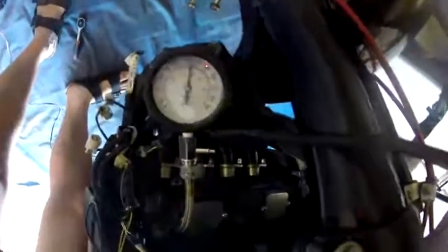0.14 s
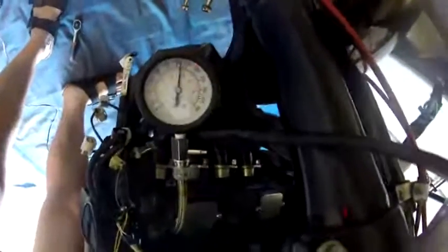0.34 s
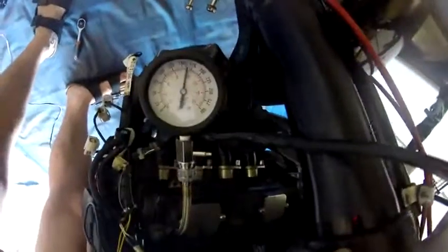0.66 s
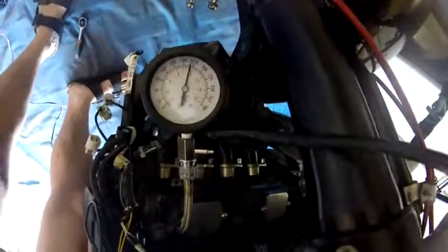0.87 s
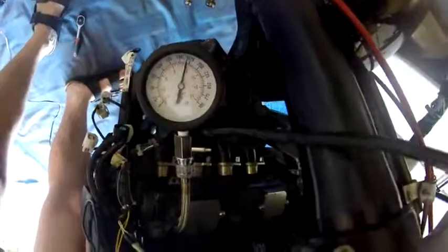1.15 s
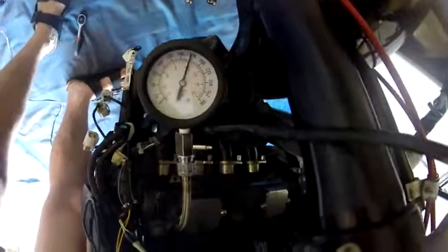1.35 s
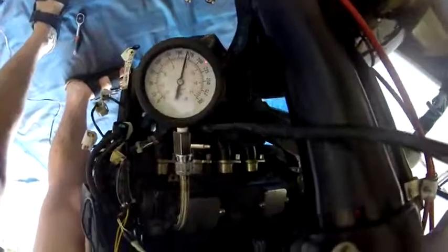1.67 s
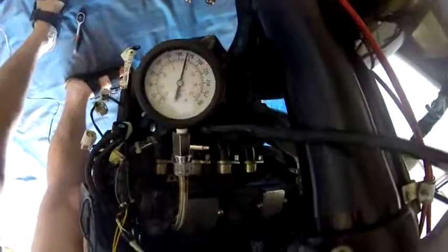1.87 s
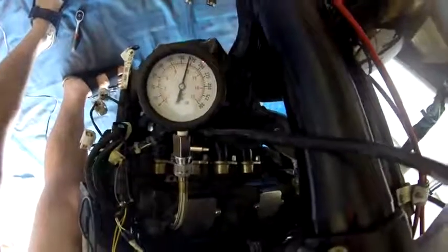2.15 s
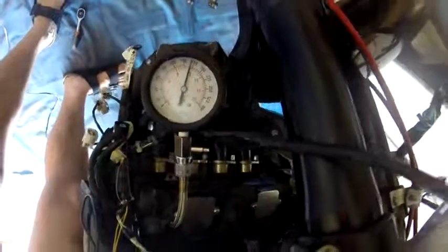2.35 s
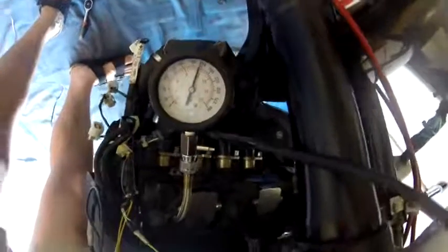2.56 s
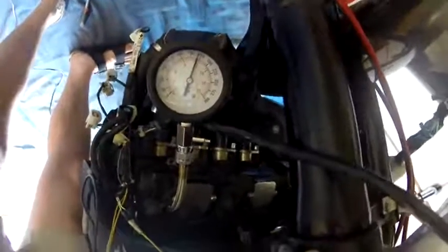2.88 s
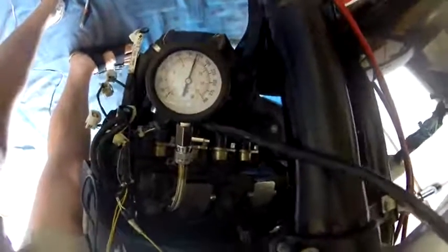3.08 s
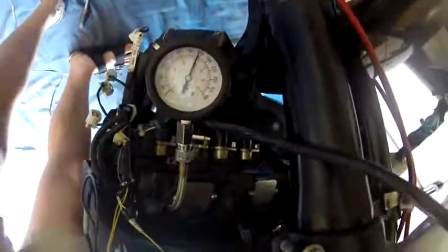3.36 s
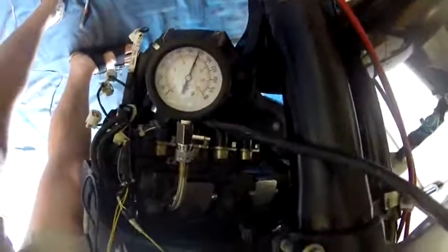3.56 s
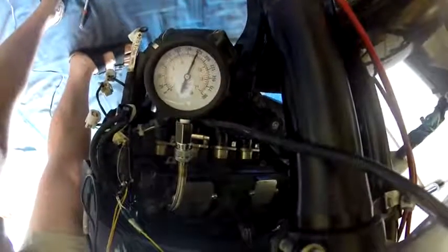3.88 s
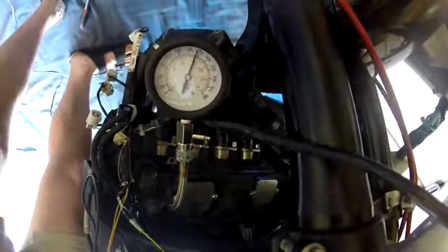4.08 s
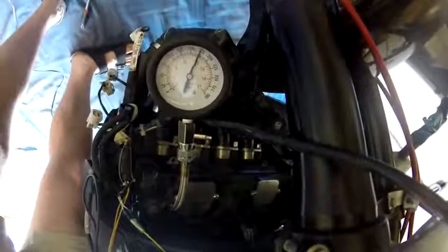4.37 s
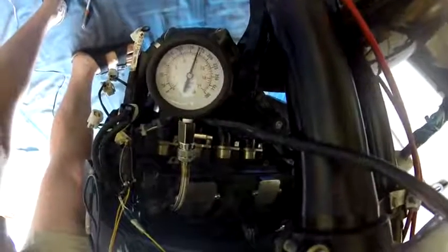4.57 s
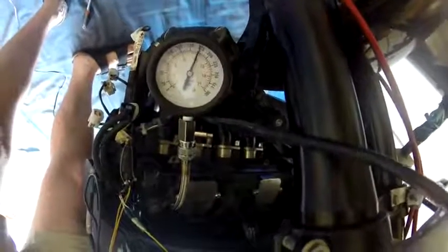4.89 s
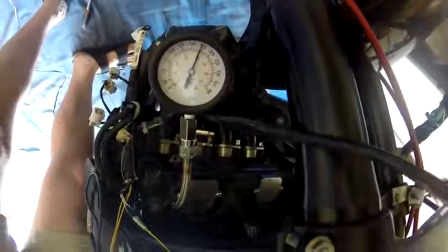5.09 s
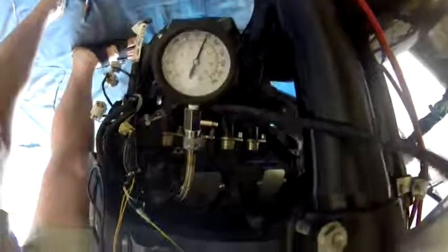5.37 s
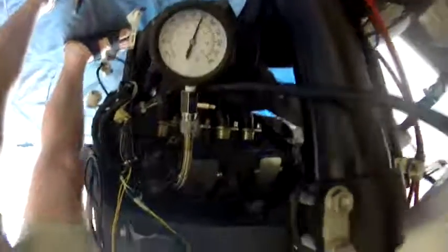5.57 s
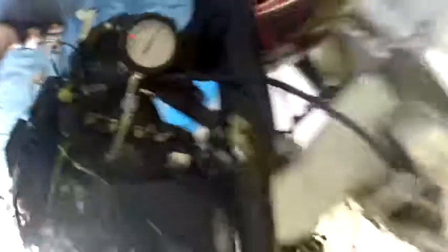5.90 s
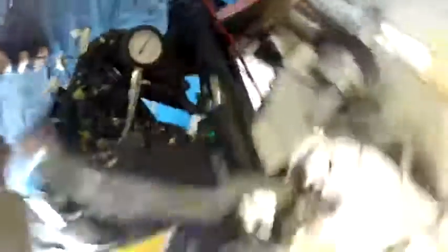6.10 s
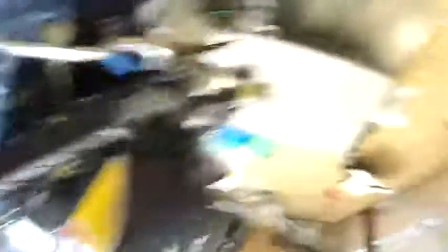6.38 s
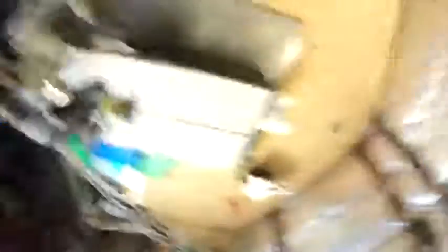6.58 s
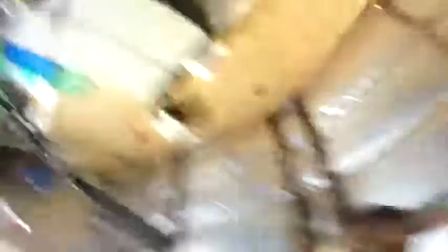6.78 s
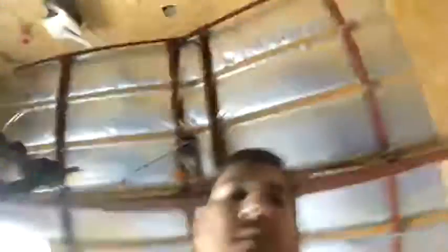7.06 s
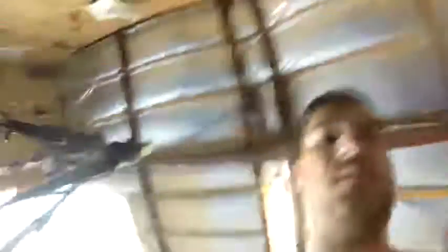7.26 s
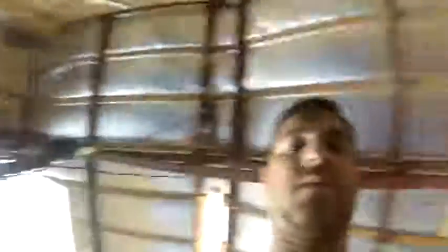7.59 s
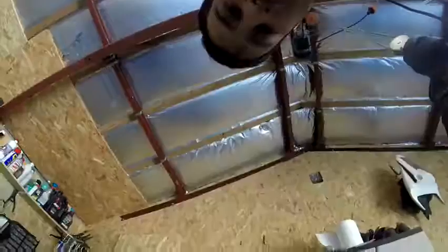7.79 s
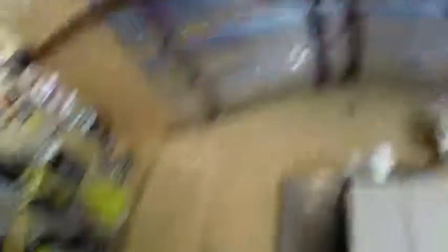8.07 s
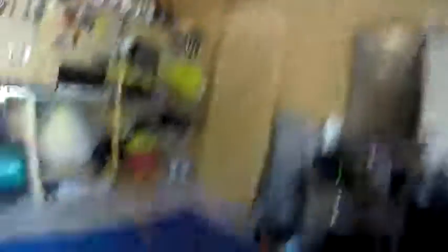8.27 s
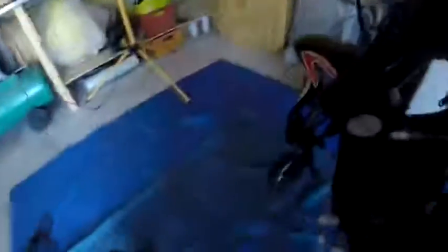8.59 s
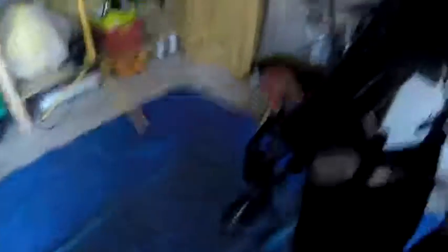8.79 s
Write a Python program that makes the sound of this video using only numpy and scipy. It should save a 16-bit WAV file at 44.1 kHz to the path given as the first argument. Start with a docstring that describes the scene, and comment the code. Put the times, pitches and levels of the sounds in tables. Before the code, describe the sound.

An electric starter cranks a motorcycle engine in clattering, whining pulses, runs down to a clack, then soft handling knocks and rustles follow.

```python
"""In a workshop, close by, an electric starter cranks a motorcycle engine with one cylinder compressing.
Three times a cycle the gears take load: impacts ring the cases (clatter) and meshing teeth give a whine.
Compression slows the drive and lowers the whine, then pressure pulses thump out of the open ports.
The starter runs down to a last clack; a hand-held object is carried about with knocks, ticks and rustles."""
import sys
import numpy as np
from scipy import signal
from scipy.fft import rfft, irfft
from scipy.io import wavfile

SR = 44100
rng = np.random.default_rng(int(sys.argv[2]) if len(sys.argv) > 2 else 0)


def to_wav(s):
    """Save 16-bit WAV."""
    ch = np.atleast_2d(s).T  # columns
    pcm = np.round(np.clip(ch, -1, 1) * 32767)  # PCM
    wavfile.write(sys.argv[1], SR, pcm.astype(np.int16))


N = 394254
TIME_S = np.arange(N) / SR

# Three gear loadings, then the push over compression: after_top_s, hold_s, clatter_db, whine_db, blow_db
GEAR_LOADS = [(0.024, 0.027, -22.5, -16.5, 3.5), (0.08, 0.04, -21, -16, 3.5),
              (.149, 0.031, -20.5, -15, 2.5), (.193, 0.02, -20.5, -12.5, 0.5)]
# Unpowered slowing of the crank: time_s, cycle_place_s, tooth_hz, clatter_change_db, whine_change_db
RUN_DOWN = [(4.6713, 0.0049, 1503, 0.38, 0.2), (4.7, 0.024, 1489, 2, -1.5), (4.716, .042, 1450, 0, -9),
            (4.765, 0.085, 1310, -3.6, -0.5), (4.81, .12, 1148, -3, -1), (4.848, 0.15, 931, -6, -8),
            (4.91, 0.16, 770.4, -6, -1), (4.965, .178, 708, -11.5, -2), (5.03, 0.19, 660, -28, -48),
            (5.12, 0.18, 600, -59.5, -80)]
# Broadband radiation of the clatter: frequency_hz, level_db
CLATTER_SPECTRUM = [(90, -34.5), (150, -16.5), (450, -18), (640, -11), (800, 1.5), (1200, -2), (2000, -2),
                    (3100, -2), (3600, -5.5), (5000, -4), (8300, -8.5), (9000, -9.5), (9600, -29.5),
                    (13000, -24), (14000, -33.5)]
# Resonances of the engine cases: pitch_hz, width_hz, gain_db
CASE_MODES = [(512, 35, -9), (589, 22, -7), (700, 40, -6), (770, 110, -3), (1275, 35, -4), (1530, 35, -1),
              (2135, 35, -1), (2535, 60, -3), (2665, 40, -5), (2770, 50, -5), (2970, 50, -6),
              (3790, 35, -9), (4202, 55, -4), (4348, 35, -6), (5300, 66, -8), (5990, 150, -7),
              (6210, 90, -7), (6575, 90, -6), (7158, 70, -5), (7910, 150, -7), (8270, 70, -7)]
# Harmonics of the tooth rate: harmonic_number, level_db
MESH_HARMONICS = [(1, -5), (2, -7.5), (3, -8), (4, -28), (5, -13.5)]
# How well the cases radiate a tone: frequency_hz, gain_db
CASE_RADIATION = [(600, -11), (760, -4), (1000, -3), (1500, 2.5), (1650, 1), (2000, -0.5), (2500, 8.5),
                  (2800, 1), (3050, -8.5), (3230, -1), (3700, -4), (4250, -0.5), (4600, .5), (4800, -11.5),
                  (6000, -5.5), (8000, -4.5)]
# Pressure pulses in the open ports: after_top_s, gain_db
PORT_PULSES = [(-.001, 0.5), (0.0154, 0.5), (.033, -6), (.044, -4.5), (.057, -14.5), (0.073, -10.5),
               (.099, -17.5), (.166, -14)]
# Vibration of the frame: frequency_hz, level_db
SHAKE_SPECTRUM = [(15, -21), (30, -14.5), (65, -5.5), (120, .5), (200, -7), (350, -4), (600, -20),
                  (1200, -46)]
# Reverberation of the workshop: frequency_hz, t60_s
ROOM_DECAY = [(300, .3), (800, .3), (2100, .27), (5500, .2), (12000, .13)]
# Background noise of the workshop: frequency_hz, level_db
HUSH_SPECTRUM = [(12, -32.5), (20, 0.5), (184, -6.5), (293, -9.5), (481, -9.5), (2630, -21), (3460, -23),
                 (14000, -43)]
# Rumble of hands on the object: time_s, level_db
RUMBLE_LEVELS = [(5.2, -54), (5.42, -72), (5.65, -61.5), (6.54, -57.5), (7.42, -55.5), (7.76, -72.5),
                 (7.9, -49), (8.08, -48), (8.16, -55), (8.63, -56.5), (8.94, -51.5)]
# Colour of that rumble: frequency_hz, level_db
RUMBLE_SPECTRUM = [(12, -18.5), (25, -1.5), (60, -7), (120, -9), (300, -16), (800, -28.5), (2000, -47)]
# Ticks and short scratches: start_s, peak_db, centre_hz, width_ratio, t60_s
LIGHT_CONTACTS = [(5.485, -48, 3500, .06, 0.05), (5.903, -43, 2300, 1.2, 0.0094),
                  (6.284, -39, 450, 1.7, 0.025), (6.523, -47, 4970, 1.2, .008),
                  (6.744, -40.5, 5500, 1.1, 0.0075), (6.959, -28.5, 2500, 2.1, 0.011),
                  (7.009, -45, 2500, 2.5, .006), (7.044, -40, 2500, 0.73, 0.0052),
                  (7.072, -40, 1200, 1.3, 0.0069), (7.084, -35.5, 700, 1.7, 0.041),
                  (7.088, -35, 2080, 0.3, .035), (7.101, -40, 1190, 1.1, 0.0066),
                  (7.291, -43, 900, 0.99, .01), (7.354, -44, 900, 2.5, .006),
                  (7.478, -39, 1200, 2.6, 0.0066), (7.93, -41, 450, 2, .03),
                  (7.963, -42.5, 4000, 1.8, 0.0061), (8.123, -45.5, 4170, .4, .03),
                  (8.122, -36.5, 497, 0.91, 0.04), (8.785, -38, 3000, 2, 0.018),
                  (8.804, -40, 3010, 2.2, .012)]
# Strokes of rubbing cloth and tarp: start_s, hold_s, level_db
RUB_STROKES = [(6.05, .02, -64), (6.297, 0.012, -60), (6.597, .02, -62.5), (6.747, .005, -59),
               (6.95, 0.12, -60), (7.08, 0.026, -56.5), (7.236, 0.025, -54), (7.3, .08, -60),
               (7.392, 0.014, -48), (7.93, 0.12, -62.5), (8.125, .01, -59), (8.233, .005, -59),
               (8.36, .02, -60), (8.534, .05, -59), (8.598, .02, -52.5), (8.635, .01, -46),
               (8.739, 0.0083, -54), (8.854, 0.068, -37), (8.922, .03, -34)]
# Friction noise of the cloth: frequency_hz, level_db
RUB_SPECTRUM = [(120, -45), (200, -14.5), (290, -4), (1270, -6), (2280, 2), (3890, -0.5), (6400, -4.5),
                (10500, -12), (14000, -23.5)]
# Dull knocks on the object: start_s, peak_db, pitch_hz, damping_per_period, first_swing_sign
BODY_KNOCKS = [(6.284, -33.5, 109.6, 3.7, -1), (6.52, -28.5, 55.4, 2, 1), (6.745, -33.5, 55.2, 1.4, -1),
               (6.959, -35, 302, 2, 1), (7.009, -35, 200, 9.7, 1), (7.066, -40, 45.3, 1.1, -1),
               (7.93, -25.5, 111, 6.2, -1), (8.015, -44, 40.3, 2.5, -1), (8.123, -46, 250, 1, -1),
               (8.785, -36, 180, 2.2, 1), (8.803, -38, 178, 1.5, 1)]

FIRST_TOP_S, CYCLE_S, TIRING_S, CYCLES = -.0675, .26391, 7.6e-5, 19
SKIP_AT_S, SKIP_S = 2.068, .0232  # the rhythm jumps ahead once


def gain_of(db):
    """Amplitude ratio of a level in decibels."""
    return 10 ** (np.asarray(db) / 20)


def unit_rms(x):
    """Normalisation to unit mean power."""
    return x / np.sqrt(np.mean(abs(x) ** 2) + 1e-20)


def at_frequency(points, hz):
    """Interpolation of a curve over log frequency."""
    known_hz, value = np.transpose(points)
    return np.interp(np.log(hz + 1), np.log(known_hz + 1), value)


def follow(rows):
    """Linear interpolation of each column over time."""
    time_s, *columns = np.transpose(rows)
    return [np.interp(TIME_S, time_s, column) for column in columns]


def add(mix, start_s, sound):
    """Superposition of a sound on the mix."""
    part = mix[round(start_s * SR):][:len(sound)]
    part += sound[:len(part)]


def coloured(x, spectrum):
    """Filtering by multiplication of spectra."""
    return irfft(rfft(x) * gain_of(at_frequency(spectrum, np.fft.rfftfreq(len(x), 1 / SR))), len(x))


def wander(hz):
    """Random modulation: low-passed noise of rms 1."""
    return unit_rms(signal.sosfilt(signal.butter(2, hz, fs=SR, output="sos"), rng.standard_normal(N)))


def ring(x, hz, width_hz):
    """A second-order resonance of peak gain 1."""
    return signal.lfilter(*signal.iirpeak(hz, hz / width_hz, SR), x)


def strokes(t, rows, rest_db, rise_db_per_s, ease_s, sag_db_per_s=0):
    """Envelope in dB: a linear rise, a sagging hold, then exponential relaxation to rest."""
    level = np.full(len(t), float(rest_db))
    for start_s, hold_s, db in rows:
        held = db - sag_db_per_s * np.clip(t - start_s, 0, hold_s)
        held -= rise_db_per_s * np.maximum(start_s - t, 0)
        release = np.exp(-np.maximum(t - start_s - hold_s, 0) / ease_s)
        level = np.maximum(level, rest_db + (held - rest_db) * release)
    return level


def top_times():
    """Tops of the compression stroke: each period is TIRING_S longer than the last."""
    k = np.arange(CYCLES)
    return FIRST_TOP_S + CYCLE_S * k + TIRING_S * k * (k - 1) / 2


def tooth_rate(place_s, base_hz=1602, overrun_hz=42, sag_hz=245, sag_from_s=.178, sag_s=.04):
    """Mesh frequency follows shaft speed: the pinion races as it meets load; compression drags it."""
    since_s = (place_s - sag_from_s) % CYCLE_S
    recovery = np.maximum(1 - (since_s - sag_s) / .069, 0)
    drag = np.where(since_s < sag_s, np.sin(np.pi / 2 * since_s / sag_s) ** 2, recovery)
    race = sum(np.exp(-abs(place_s - load[0]) / .008) for load in GEAR_LOADS[:-1])
    return base_hz + overrun_hz * race - sag_hz * drag


def crank(bounce_s=.02, blow_s=.0045):
    """Cyclic loading sets clatter level, tooth rate and whine level; teeth part and strike again."""
    cycles = np.interp(TIME_S + SKIP_S * (TIME_S > SKIP_AT_S), top_times(), np.arange(CYCLES))
    slow_place_s, slow_hz, clatter_db, whine_db = follow(RUN_DOWN)
    powered = cycles < CYCLES - 1
    place_s = np.where(powered, cycles % 1 * CYCLE_S, slow_place_s)
    strength = rng.random((CYCLES, len(GEAR_LOADS), 2))[cycles.astype(int)]
    blows_db = np.zeros(N)
    for k, (after_s, *_, db) in enumerate(GEAR_LOADS):
        for bounce in range(2):
            contact = np.exp(-((place_s - after_s - bounce * bounce_s) / blow_s) ** 2)
            blows_db += db * strength[:, k, bounce] * contact
    push = GEAR_LOADS[-1]  # fades on into the next cycle
    loads = np.array([*GEAR_LOADS, (push[0] - CYCLE_S, *push[1:])])
    clatter_db += blows_db + strokes(place_s, loads[:, :3], -34.5, 1298.5, .026, sag_db_per_s=16.5)
    whine_db += 1.33 * blows_db + strokes(place_s, loads[:, [0, 1, 3]], -47, 3502, .014, sag_db_per_s=150)
    return clatter_db, np.where(powered, tooth_rate(place_s), slow_hz), whine_db


def clatter(level_db, hits_per_s=5000):
    """Impact excitation: dense, uneven blows of gears, chain and valves ring the modes of the cases."""
    sizes = gain_of(3 * np.minimum(rng.exponential(1, N), 5))
    struck = rng.random(N) < hits_per_s / SR
    blows = unit_rms(sizes * struck * rng.choice([-1., 1.], N))
    load = gain_of(level_db + .62 * wander(81))
    drive = unit_rms(blows * gain_of(2 * wander(75)))
    broad = coloured(blows * load, CLATTER_SPECTRUM) / coloured(blows, CLATTER_SPECTRUM).std()
    ringing = sum(gain_of(db) * ring(np.roll(drive, 9973 * k) * load, hz, width)  # own blows per mode
                  for k, (hz, width, db) in enumerate(CASE_MODES))
    passed_power = sum(gain_of(2 * db) * np.pi * width / SR for _, width, db in CASE_MODES)
    return broad + gain_of(1) * ringing / np.sqrt(passed_power)


def whine(tooth_hz, level_db, dulling_db=18, cover_hz=1486):
    """Gear-mesh harmonics, modulated by run-out and play, grow rougher and duller as the drive slackens."""
    roughness = .45 + 2.5 * np.clip(1 - tooth_hz / 1400, 0, 1)
    slack = np.clip(1 - tooth_hz / 1100, 0, 1)
    phase = 2 * np.pi * np.cumsum(tooth_hz * (1 + .002 * wander(27))) / SR
    tone = np.zeros(N)
    for k, db in MESH_HARMONICS:
        depth = roughness * np.sqrt(k)
        flutter = (1 + depth * (wander(83) + 1j * wander(110))) / np.sqrt(1 + 2 * depth ** 2)
        radiated_db = db + at_frequency(CASE_RADIATION, k * tooth_hz) - dulling_db * (k - 1.5) * slack
        tone += gain_of(radiated_db) * (flutter * np.exp(1j * k * phase)).real
    tone *= np.sqrt(2) * gain_of(level_db)
    return tone + ring(tone, cover_hz, width_hz=40)  # a cover resonates as the pitch passes


def port_thumps(swing_s=.0021):
    """Bipolar pressure pulses, suction first, leave the ports each cycle; the last group is weak."""
    u = np.arange(-500, 500) / SR / swing_s
    pulse = u * np.exp(.5 - u ** 2 / 2)
    out = np.zeros(N + SR)  # a second of lead holds pulses before time zero
    strength_db = np.append(-21 - .04 * np.arange(CYCLES - 1), -27)
    for top_s, top_db in zip(top_times(), strength_db):
        for after_s, db in PORT_PULSES:
            centre_s = top_s + after_s - SKIP_S * (top_s + after_s > SKIP_AT_S)
            add(out, 1 + centre_s - 500 / SR, gain_of(top_db + db) * pulse)
    return out[SR:]


def frame_shake(clatter_db):
    """Forced vibration of the frame: low noise that follows the clatter level."""
    running_db = .12 * np.minimum(clatter_db + 45, 12) + np.minimum(clatter_db + 29.5, 0)
    return gain_of(running_db - 40.5) * unit_rms(coloured(rng.standard_normal(N), SHAKE_SPECTRUM))


def reverberation(x):
    """Diffuse reflections of random sign; each band decays exponentially at its own rate."""
    taps = np.zeros(SR)
    arrivals = np.arange(300, SR - 20, 20) + rng.integers(0, 20, (SR - 301) // 20)
    taps[arrivals] = rng.choice([-1., 1.], len(arrivals))
    hz, t, bands = signal.stft(taps, SR, nperseg=256)
    decay = gain_of(-60 * t / at_frequency(ROOM_DECAY, hz)[:, None])
    tail = signal.istft(bands * decay, SR, nperseg=256)[1]
    return signal.fftconvolve(x, tail / np.linalg.norm(tail))[:N]


def room_hush(level_db=-56):
    """Stationary background noise, strongest in the bass."""
    return gain_of(level_db) * unit_rms(coloured(rng.standard_normal(N), HUSH_SPECTRUM))


def hand_rumble():
    """Structure-borne noise of hands: a low rumble, randomly modulated in level."""
    rumble = unit_rms(coloured(rng.standard_normal(N), RUMBLE_SPECTRUM))
    return rumble * gain_of(follow(RUMBLE_LEVELS)[0] + 2 * wander(12))


def last_clack(start_s=5.071, hold_s=.0049, centre_hz=2600, width_hz=3500):
    """Impact noise in a broad band as the crank rocks back and stops."""
    level_db = strokes(TIME_S, [(start_s, hold_s, -30)], rest_db=-110, rise_db_per_s=4000, ease_s=.099)
    burst = rng.standard_normal(N) * gain_of(level_db)
    return ring(ring(burst, centre_hz, width_hz), centre_hz, width_hz)


def ticks():
    """Contact transients: band-passed noise with a fast exponential decay."""
    out, t = np.zeros(N), np.arange(4000) / SR
    for start_s, db, hz, width_ratio, t60_s in LIGHT_CONTACTS:
        burst = rng.standard_normal(len(t)) * gain_of(-60 * t / t60_s)
        tick = ring(ring(burst, hz, width_ratio * hz), hz, width_ratio * hz)
        add(out, start_s, gain_of(db) * tick / abs(tick).max())
    return out


def rustle():
    """Friction of cloth and tarp: grainy noise that swells with each stroke."""
    grains = rng.standard_normal(N) * gain_of(-1.5 * np.minimum(rng.exponential(1, N), 5) + 2 * wander(60))
    level_db = strokes(TIME_S, RUB_STROKES, rest_db=-73.5, rise_db_per_s=500, ease_s=.049)
    return unit_rms(coloured(grains, RUB_SPECTRUM)) * gain_of(level_db)


def knocks():
    """Free vibration of the knocked object: one heavily damped sinusoid per blow."""
    out, t = np.zeros(N), np.arange(4000) / SR
    for start_s, db, hz, damping, sign in BODY_KNOCKS:
        knock = np.sin(2 * np.pi * hz * t) * np.exp(-damping * hz * t)
        add(out, start_s, sign * gain_of(db) * knock / knock.max())
    return out


def scene():
    """Superposition of all sources in one channel; only clatter, whine and clack reverberate."""
    clatter_db, tooth_hz, whine_db = crank()
    engine = clatter(clatter_db) + whine(tooth_hz, whine_db) + last_clack()
    room = room_hush() + gain_of(-12.5) * reverberation(engine)
    bass = port_thumps() + frame_shake(clatter_db)
    handling = hand_rumble() + rustle() + ticks() + knocks()
    return (engine + room + bass + handling)[None]


def record(dry, silent_from_s=7.607, silent_to_s=7.704, cutoff_hz=13700):
    """Soft saturation rounds the peaks, the sound drops out briefly, and a low-pass limits the band."""
    ramps = np.maximum((silent_from_s - TIME_S) / .0031, (TIME_S - silent_to_s) / .0085)
    gate = np.clip(ramps + 1, 0, 1) ** 2
    low_pass = signal.firwin(511, cutoff_hz, window=("kaiser", 9), fs=SR)
    return signal.oaconvolve(np.tanh(dry) * gate, low_pass[None], "same")


dry = scene()
out = record(dry)
to_wav(out)
```